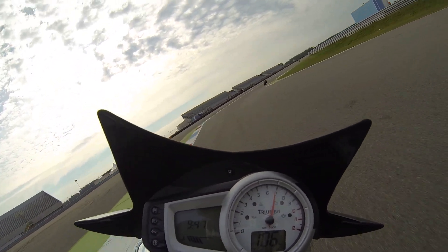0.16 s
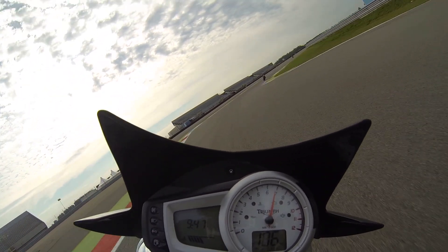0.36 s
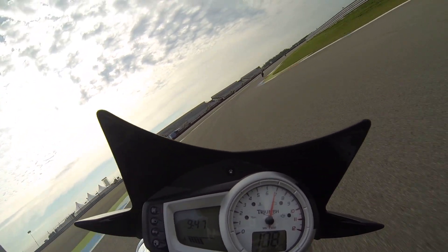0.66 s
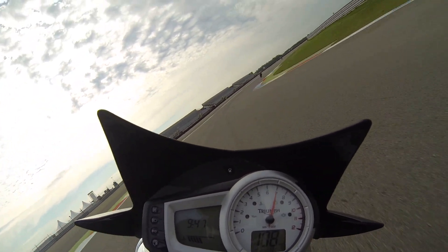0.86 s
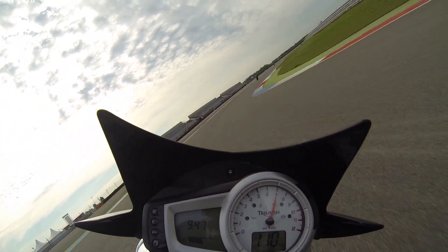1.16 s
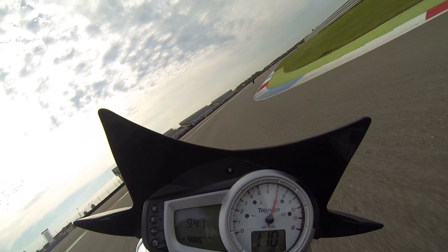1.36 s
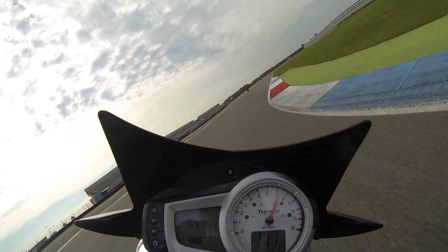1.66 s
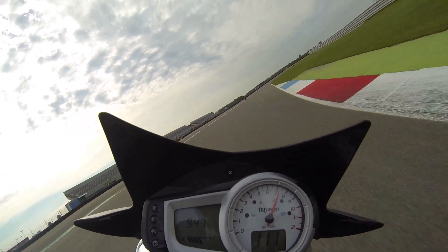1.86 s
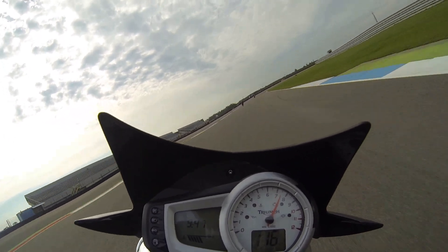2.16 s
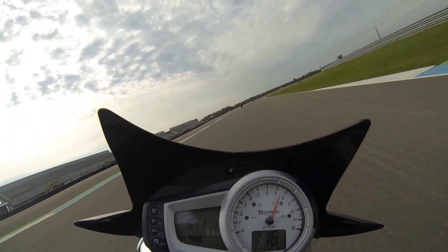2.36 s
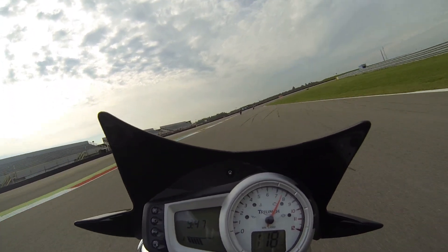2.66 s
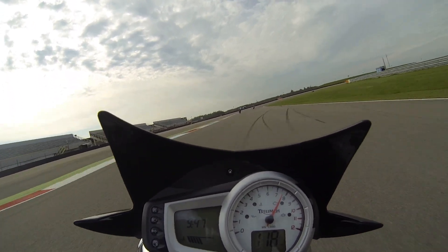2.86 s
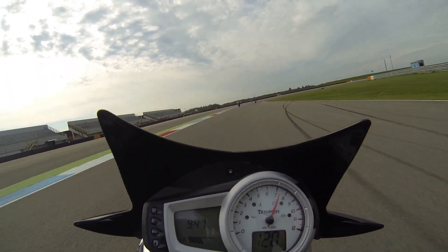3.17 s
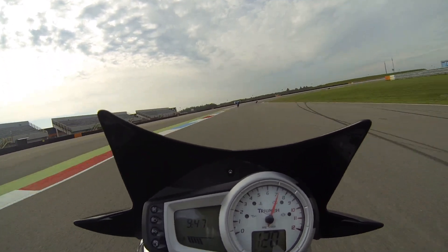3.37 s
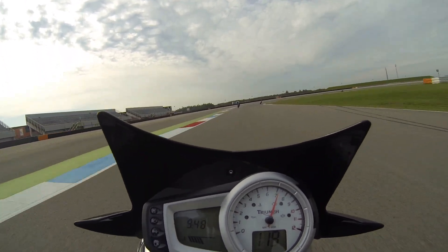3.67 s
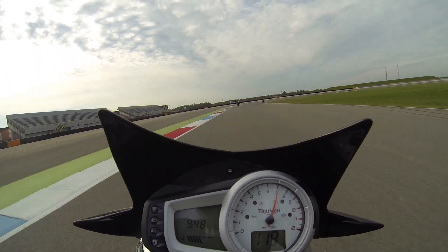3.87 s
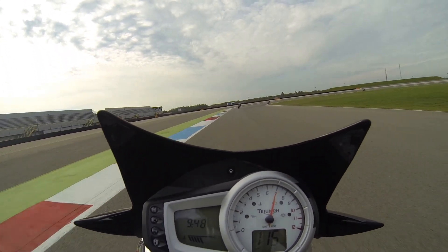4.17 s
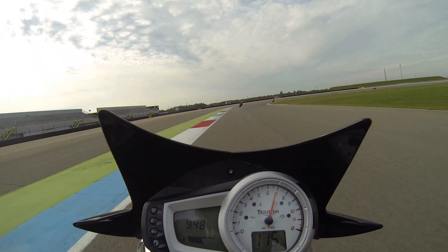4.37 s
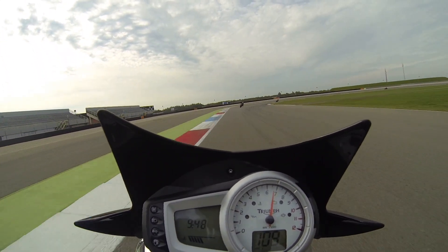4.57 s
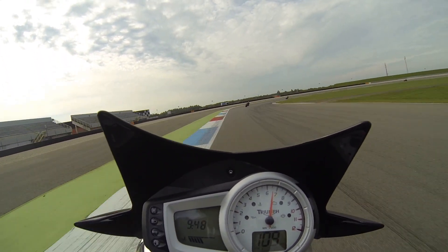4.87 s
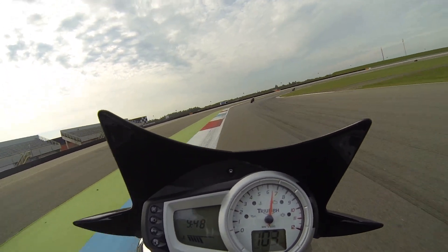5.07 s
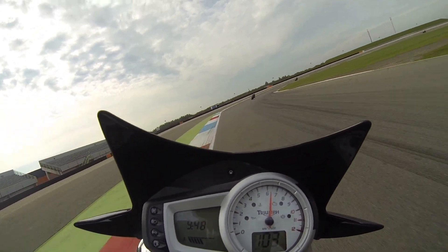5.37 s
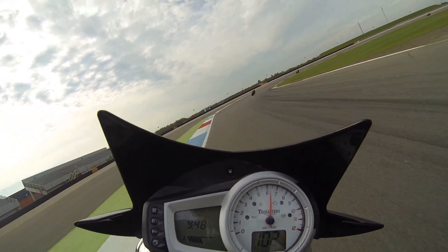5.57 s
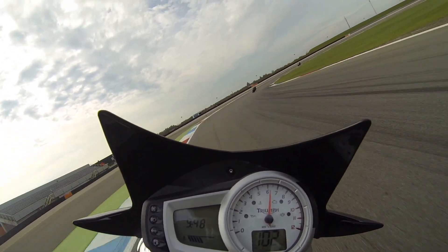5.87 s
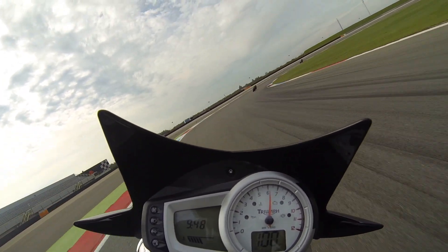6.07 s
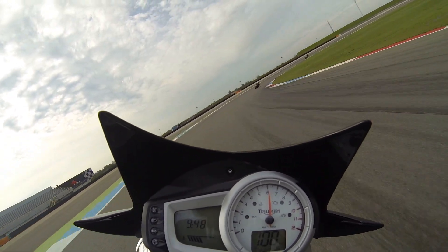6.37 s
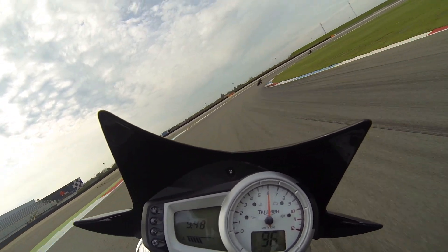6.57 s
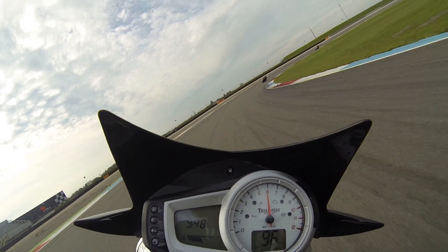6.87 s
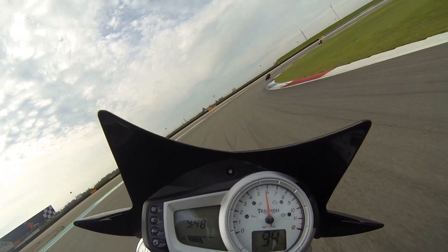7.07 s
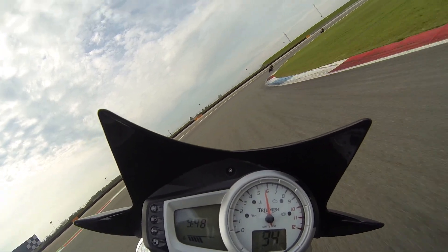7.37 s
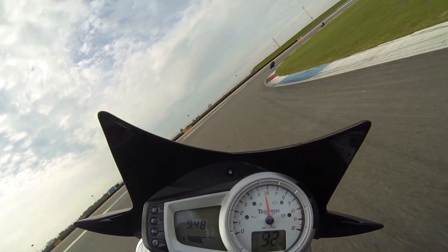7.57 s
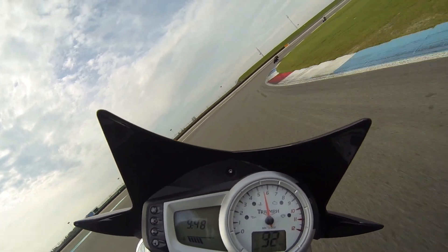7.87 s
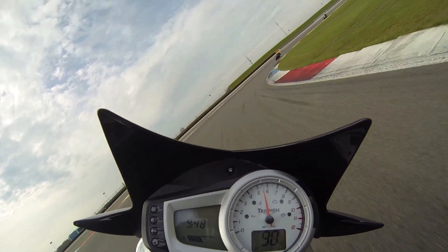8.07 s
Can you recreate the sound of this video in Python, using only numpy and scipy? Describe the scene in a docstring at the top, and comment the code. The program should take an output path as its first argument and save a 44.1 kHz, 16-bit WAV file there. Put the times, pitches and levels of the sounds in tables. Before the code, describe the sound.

A motorcycle on a race track drones low and steady, then rolls off and sinks in pitch with a rough, rattling throb under soft wind.

```python
"""Three-cylinder motorcycle, on and off the throttle

A motorcycle on a race track, heard through a hollow camera housing fixed behind its instruments. Crank-locked
sines make a drone, smooth on the throttle, then a rough, rattling throb as the bike rolls off and slows.
A repeating comb of engine orders and random contacts clatter through the housing's resonances; the chain whines,
valves tick, a small metal part jingles, and shaped noise makes the wind's rush and buffeting."""
import sys
import numpy as np
from scipy import signal
from scipy.fft import rfft, irfft, next_fast_len
from scipy.io import wavfile

SR = 44100
rng = np.random.default_rng(int(sys.argv[2]) if len(sys.argv) > 2 else 0)


def unload_wav(signal):
    """Save mono or channel-first audio to the path in sys.argv[1] as 16-bit WAV at rate SR, clipped to [-1, 1]."""
    wavfile.write(
        sys.argv[1],
        SR,
        np.round(np.clip(np.atleast_2d(signal).T, -1, 1) * 32767).astype(np.int16),
    )


N = 362061

# Wind and road shaking the mount; drives jingle and buffeting. Each row: time in seconds, level in dB.
MOUNT_SHAKING = [(0.0, -51), (0.29, -48), (0.95, -57.5), (1.04, -65.5), (1.47, -54), (1.7, -67.5),
                 (2.81, -72), (3.28, -58.5), (3.37, -65), (4.03, -55.5), (4.25, -62), (4.45, -51),
                 (6.56, -51.5), (8.2, -61.5)]
# Gusts that thump the mount. Each row: time in seconds, half length in seconds, rise in dB.
GUSTS = [(1.493, 0.051, 7), (7.849, 0.2, 5)]
# Colour of the buffeting. Each row: frequency in Hz, relative density in dB.
BUFFET_COLOUR = [(10, -19), (24, 5), (38, -8.5), (70, -13.5), (95, 2.5), (118, 3.5), (150, -11.5),
                 (200, -13), (300, -22), (500, -34), (1000, -68)]
# Colour of the air over the fairing. Each row: frequency in Hz, relative density in dB.
RUSH_COLOUR = [(100, -5), (300, 3), (600, -4.5), (2000, -13), (5500, -30.5), (9500, -33.5), (13000, -54.5)]
# Rasps that rise in pitch. Each row: start in seconds, end in seconds, level in dB.
RISING_RASPS = [(.23, 0.373, -33), (.82, 0.932, -37)]
# Housing buzzes. Each row: time in seconds, half length in seconds, peak level in dB.
BUZZES = [(2.02, 0.027, -46.5), (2.125, 0.032, -45), (2.82, 0.058, -46), (5.14, 0.028, -34),
          (6.503, 0.16, -42), (6.684, .05, -32.5), (7.3, 0.16, -43.5)]
# Resonances of the housing. Each row: frequency in Hz, width in Hz, boost in dB.
HOUSING_RESONANCES = [(620, 17, 0.5), (673, 120, 9.5), (867, 13, 6), (1245, 20, 7.5), (1346, 31, 6.5),
                      (1673, 61, 8), (1741, 53, 6.5), (2214, 170, 10.5), (2434, 110, 6.5), (2587, 19, 9.5),
                      (2930, 67, 2), (3457, 230, 10.5), (3870, 51, 8.5), (4340, 88, 5.5), (4750, 180, 4)]
# Passages where the chain sings out. Each row: start in seconds, end in seconds, whine in dB, its octave in dB.
CHAIN_SONGS = [(0.23, 0.477, -29.5, -55), (0.586, 0.775, -32, -53), (4.506, 4.724, -35.5, -47),
               (4.983, 5.193, -34, -45), (5.753, 6.015, -39, -38.5), (6.038, 6.626, -37.5, -37.5),
               (7.02, 7.48, -38, -41)]
# How hard the machine rattles; drives clatter, whine and roughness. Each row: time in seconds, level in dB.
RATTLE = [(0.0, -31), (0.42, -24.5), (0.52, -32.5), (0.89, -31), (0.98, -38.5), (1.24, -37), (1.49, -28.9),
          (1.7, -41), (2.7, -39.5), (2.79, -37.5), (3.71, -42), (3.92, -36), (4.28, -38), (4.51, -26),
          (5.15, -28.5), (5.29, -33), (5.73, -28.5), (6.71, -30.5), (6.8, -32.5), (8.2, -34.5)]
# Jolts that lift the rattling and shake the mount. Each row: time in seconds, half length in seconds, rise in dB.
JOLTS = [(0.261, .05, 1), (.72, .04, 5.5), (3.24, .045, 4.5), (3.982, .06, 3.5), (4.559, .05, 3.5),
         (5.091, 0.059, 3), (5.788, .05, 4)]
# Broad colour of the clatter. Each row: frequency in Hz, relative density in dB.
CLATTER_COLOUR = [(150, -12.5), (300, -4.5), (480, -4), (900, 0), (1150, -0.5), (1500, -5), (2000, -11),
                  (2900, -18.5), (4200, -23), (5300, -30), (7600, -37), (9500, -35.5), (12000, -48.5),
                  (15000, -58.5)]
# Orders that stand out of the engine's ticking. Each row: multiple of crank speed, relative strength in dB.
STRONG_ORDERS = [(3.5, 4), (4, 3), (4.5, 5), (5, 3), (5.5, 5), (6, -9), (7, 2), (8, 4), (9, 2), (11, 3),
                 (17, 6), (21, 2), (24, 5), (27.5, 4), (43, 7), (46, 6)]
# Engine speed. Each row: time in seconds, crank turns per second.
CRANK_SPEED = [(0.0, 104.2), (0.13, 104.3), (0.38, 102.4), (0.47, 103.6), (0.68, 103.5), (0.77, 106.9),
               (0.87, 105.9), (1.3, 106.1), (1.64, 110.6), (2.0, 111.4), (2.26, 113.7), (2.55, 114.1),
               (2.85, 115.0), (3.06, 113.2), (3.15, 111.7), (3.47, 110.4), (3.99, 105.9), (4.81, 99.6),
               (5.06, 98.1), (6.02, 94.3), (6.35, 91.6), (7.11, 87.5), (7.51, 86.3), (8.2, 82.7)]
# Once-a-turn shake of the crank, before the sags. Each row: time in seconds, level in dB.
CRANK_SHAKE = [(0.0, -12.5), (2.81, -7.5), (4.28, -9), (4.41, -18), (4.81, -19), (4.92, -12.5), (5.35, -25),
               (5.61, -15), (6.49, -11), (8.2, -14.5)]
# Throb of the firings. Each row: time in seconds, level in dB.
FIRING_THROB = [(0.0, -19.6), (0.4, -12), (0.54, -25.5), (0.87, -20), (0.98, -30.5), (1.51, -19.3),
                (1.62, -34.5), (2.14, -44.5), (3.06, -40.5), (3.24, -26), (3.33, -34), (4.27, -21),
                (4.62, -10), (4.98, -14.5), (5.27, -14), (6.1, -19.5), (6.22, -25.4), (8.2, -11)]
# Overtones of the drone against engine speed, before swing and sags.
# Each row: crank turns per second, order 2 in dB, order 3 in dB.
OVERTONES = [(81.6, -26.5, -32.5), (93.4, -28.5, -27), (94.4, -32.5, -31.5), (103.6, -40.5, -31),
             (112.6, -38, -32), (111.3, -40, -30), (119.7, -29, -26)]
# Brief sags of the drone; a negative loss is a rise.
# Each row: time in seconds, half length in seconds, loss of the shake in dB, loss of the overtones in dB.
SAGS = [(0.228, 0.031, 15, -5), (0.369, .04, 16, -4.5), (0.65, .05, 3.5, 0), (.84, 0.023, 17, -3),
        (1.127, 0.22, -0.5, 8), (1.662, 0.091, 1.5, 6.5), (1.454, 0.06, 3, 4), (3.226, 0.023, 6.5, 10.5),
        (3.842, 0.061, 2.5, 4.5), (4.188, 0.11, 0.5, 6.5), (4.464, 0.03, 14, -2.5), (4.763, 0.077, 3, 10.5)]
# Hums at four times the firing rate. Each row: time in seconds, half length in seconds, peak level in dB.
HUMS = [(0.588, 0.1, -38), (3.699, 0.057, -43), (4, 0.15, -32.5), (4.58, 0.14, -39.5), (5.096, 0.15, -36),
        (5.607, 0.16, -38), (8.146, 0.18, -48)]
# Faint orders of the drone.
# Each row: multiple of crank speed, level in dB at the usual rattle, share of the rattling's swing.
FAINT_ORDERS = [(1 / 2, -43.5, 0.99), (5 / 2, -48.5, 1.0), (4, -53.5, 0.12)]

USUAL_RATTLE_DB, USUAL_MOUNT_DB = -32, -56
# Layers that follow the rattling: level in dB at the usual rattle, share of its swing.
DULL, RASP, EDGE = (-38.0, 1.2), (-38.5, 1.0), (-47.24, 1)
WHINE, WHINE_OCTAVE, SIXTH_ORDER = (-46.5, 1.2), (-51.5, 1.3), (-52.5, .6)
# Layers that follow the mount: level in dB at the usual shaking, share of its swing.
JINGLE, BUFFETING = (-57.5, 1.05), (-27, 0.74)
THIRD_ORDER_SHARE = 0.41  # of the rattling's swing
WHEEL_PER_TURN = .157  # wheel turns per crank turn
WHEEL_RIPPLE = 0.018  # share of the crank shake, before it grows with unrest
REBOUND_DB, REBOUND_AFTER = 1.03, 3.2  # overshoot after a sag, and its delay in half lengths
RASP_FROM_HZ, RASP_TO_HZ = 800, 1154
BUZZ_HZ, BUZZ_WIDTH_HZ = 1238, 70
TICK_DB, TICK_SPREAD_DB, TICK_HZ, TICK_WIDTH_HZ = -68.5, 8, 5900, 3400
CHAIN_FADE_S = 0.081
CUTOFF_HZ = 15700


def from_db(db):
    """Decibels to gain."""
    return 10 ** (np.asarray(db) / 20)


def rms_one(x):
    """Scale to unit rms."""
    return x / np.sqrt(np.mean(x ** 2) + 1e-20)


def in_time(rows):
    """Draw each column of a time table as a curve, sample by sample."""
    s, *columns = np.transpose(rows)
    return [np.interp(np.arange(N) / SR, s, column) for column in columns]


def follow(layer, swing_db):
    """Level in dB of a layer that takes its share of a swing."""
    level_db, share = layer
    return level_db + share * swing_db


def bump(s, half_length):
    """A bell-shaped swell of height 1 around time s."""
    return np.exp(-((np.arange(N) / SR - s) / half_length) ** 2)


def held(start, end, fade_s):
    """Fade in, hold at up to 1, fade out; the fades are centred on start and end."""
    t = np.arange(N) / SR
    return np.clip(.5 + np.minimum(t - start, end - t) / fade_s, 0, 1)


def drift(rate):
    """Smooth random wander of spread 1 that changes about rate times a second."""
    step = 40  # samples between the points of the wander
    r = np.exp(-2 * step * np.pi * rate / SR)
    noise = rng.standard_normal(N // step + 2002)
    slow = rms_one(signal.lfilter([1], [1, -2 * r, r * r], noise)[2000:])  # drop the filter's start
    return np.interp(np.arange(N) / step, np.arange(len(slow)), slow)


def coloured(x, spectrum):
    """Filter a signal with a smooth tone curve; rms 1."""
    size = next_fast_len(N + SR // 2)
    hz, db = np.transpose(spectrum)
    bins = np.maximum(np.arange(size // 2 + 1) * SR / size, 1)
    gain = from_db(np.interp(np.log(bins), np.log(hz), db))
    return rms_one(irfft(rfft(x, size) * gain, size)[:N])


def resonate(x, hz, width):
    """A two-pole resonance with a gain of about 1 at its peak."""
    r = np.exp(-np.pi * width / SR)
    feed = np.array([1, 0, -1]) * (1 - r * r) / 2
    return signal.lfilter(feed, [1, -2 * r * np.cos(2 * np.pi * hz / SR), r * r], x + 1e-18)


def lowpass(hz):
    """Fourth-order low-pass sections."""
    return signal.butter(4, hz, fs=SR, output="sos")


def loose_hits(per_s, spread_db):
    """Random contacts of uneven size and either sign; rms 1."""
    sizes = from_db(spread_db * np.minimum(rng.exponential(1, N), 4)) * rng.choice([-1, 1], N)
    return rms_one(sizes * (rng.random(N) < per_s / SR))


def wind(buffet_db):
    """Turbulence: low noise buffets the mount under a gently varying rush of air."""
    buffet = from_db(buffet_db) * coloured(rng.standard_normal(N), BUFFET_COLOUR)
    rush = from_db(-44.0) * coloured(rng.standard_normal(N), RUSH_COLOUR)
    return buffet + rush * from_db(0.8 * drift(4.8))


def jingle(level_db):
    """Random contacts knock a small loose metal part into a single high ring."""
    ring = resonate(loose_hits(per_s=230, spread_db=-3.0), hz=6965, width=38)
    return rms_one(ring) * from_db(level_db)


def rising_rasps():
    """A narrow, rough band of noise slides upward and quickly fades."""
    out = 0
    for start, end, level_db in RISING_RASPS:
        hz, = in_time([(start, RASP_FROM_HZ), (end, RASP_TO_HZ)])
        angle = 2 * np.pi * np.cumsum(hz) / SR
        band = drift(130) * np.cos(angle) + drift(130) * np.sin(angle)
        out = out + from_db(level_db) * held(start, end, fade_s=0.033) * band
    return out


def buzzes():
    """Runs of contacts set a mid resonance of the housing buzzing."""
    gain = sum(from_db(db) * bump(s, half) for s, half, db in BUZZES)
    hits = loose_hits(per_s=760, spread_db=6.0)
    return gain * rms_one(resonate(hits, BUZZ_HZ, BUZZ_WIDTH_HZ))


def valve_ticks(turns):
    """Strikes of uneven size twice a crank turn excite a broad, high resonance."""
    strikes = np.diff(np.floor(2 * turns), prepend=0)
    sizes = from_db(TICK_SPREAD_DB * np.minimum(rng.standard_normal(N), 2.2))
    click = strikes * sizes
    for _ in range(2):
        click = resonate(click, TICK_HZ, TICK_WIDTH_HZ)
    return from_db(TICK_DB) * rms_one(signal.sosfilt(lowpass(10500), click))


def housing(x):
    """The hollow housing lifts its own resonances; rms 1."""
    for hz, width, boost_db in HOUSING_RESONANCES:
        x = x + (from_db(boost_db) - 1) * resonate(x, hz, width)
    return rms_one(x)


def engine_order(turns, multiple, level_db, rough, flutter_hz):
    """A sine locked to the crank, fluttering in strength and phase around its level."""
    angle = 2 * np.pi * multiple * turns
    in_phase = (1 + rough * drift(flutter_hz)) * np.cos(angle)
    across = rough * drift(flutter_hz) * np.sin(angle)
    return np.sqrt(2) * from_db(level_db) * (in_phase + across)


def chain(turns, swing_db):
    """Links meet the sprocket in a wavering whine that pulses with the wheel and rings in the housing."""
    whine_gain = from_db(follow(WHINE, swing_db))
    octave_gain = from_db(follow(WHINE_OCTAVE, swing_db))
    for start, end, whine_db, octave_db in CHAIN_SONGS:
        song = held(start, end, CHAIN_FADE_S)
        whine_gain = np.hypot(whine_gain, from_db(whine_db) * song)
        octave_gain = np.hypot(octave_gain, from_db(octave_db) * song)
    links_per_turn = 6.6
    tension = np.sin(2 * np.pi * WHEEL_PER_TURN * turns + 0.52 * drift(9.7))
    meshing = turns + .011 * tension  # tension shifts the meeting of the links
    whine = housing(engine_order(meshing, links_per_turn, 0, rough=0.44, flutter_hz=30.6))
    octave = housing(engine_order(meshing, 2 * links_per_turn, 0, rough=0.45, flutter_hz=30))
    return whine_gain * whine * (1 + .25 * tension) + octave_gain * octave * (1 + .65 * tension)


def valve_gear(turns, rough, count=104, size=4096):
    """Ticking that repeats every two turns: an uneven comb of half orders whose balance slowly shifts."""
    strength = from_db(2.5 * rng.standard_normal(count) - 1.5)
    strength[:7] = 0  # nothing below order 3.5
    for multiple, db in STRONG_ORDERS:
        strength[int(round(2 * multiple))] = from_db(db)
    out = 0
    # one steady cycle, and two whose shares wander
    for share in (1, rough * drift(1.5), rough * drift(6)):
        cycle = irfft(strength * np.exp(2j * np.pi * rng.random(count)), size)
        place = turns / 2 % 1 * size
        out = out + share * np.interp(place, np.arange(size + 1), np.append(cycle, cycle[0]))
    return rms_one(out)


def clatter(turns, dull_db, rasp_db, edge_db, unrest):
    """Regular engine ticking and loose fairing chatter ring in the housing, levelled in three bands."""
    play = 0.00094 * drift(40)  # looseness of the timing, in turns
    ticking = .8 * coloured(valve_gear(turns + play, rough=.35), CLATTER_COLOUR)
    ticking *= from_db(-.35 * np.maximum(dull_db + 41.5, 0))  # hard shaking favours chatter over ticking
    hits = loose_hits(per_s=2000, spread_db=-1.0) * from_db(1.66 * drift(15))
    chatter = .68 * coloured(hits, CLATTER_COLOUR) * unrest ** .2
    # contact pressure follows engine cycle, crank turn, piston reversal and wheel turn
    pressed = 1 + 0.07 * np.cos(np.pi * turns) + 0.074 * np.cos(2 * np.pi * turns)
    pressed += 0.22 * np.cos(4 * np.pi * turns)
    pressed += 0.027 * np.sin(2 * np.pi * WHEEL_PER_TURN * turns)
    sound = housing((ticking + chatter) * pressed)
    dull = signal.sosfiltfilt(lowpass(1150), sound)
    body = signal.sosfiltfilt(lowpass(2750), sound)
    out = from_db(dull_db) * rms_one(dull)
    out += from_db(rasp_db) * rms_one(body - dull)
    return out + from_db(edge_db) * rms_one(sound - body)


def drone(speed, turns, swing_db, unrest):
    """Crank shake, three firings in two turns, overtones and a gearbox shaft; some roughen with unrest."""
    (shake_db,), (firing_db,) = in_time(CRANK_SHAKE), in_time(FIRING_THROB)
    speeds, *columns = np.transpose(OVERTONES)
    second_db, third_db = [np.interp(speed, speeds, column) for column in columns]
    third_db = third_db + THIRD_ORDER_SHARE * swing_db
    for s, half, shake_loss_db, overtone_loss_db in SAGS:
        sag = bump(s, half)
        rebound = bump(s + REBOUND_AFTER * half, half)
        shake_db = shake_db - shake_loss_db * sag + REBOUND_DB * rebound
        second_db = second_db - overtone_loss_db * sag
        third_db = third_db - overtone_loss_db * sag
    hum = from_db(follow(SIXTH_ORDER, swing_db))
    hum = hum + sum(from_db(db) * bump(s, half) for s, half, db in HUMS)

    out = engine_order(turns, 1, shake_db, rough=0.02 * unrest ** 2, flutter_hz=35)
    out *= 1 + WHEEL_RIPPLE * (1 + unrest) * np.sin(2 * np.pi * WHEEL_PER_TURN * turns)
    firing_lag_turns = 1 / 12
    out += engine_order(turns - firing_lag_turns, 3 / 2, firing_db, rough=0.16 * unrest, flutter_hz=9)
    out += engine_order(turns, 2, second_db, rough=.2, flutter_hz=4.6)
    out += engine_order(turns, 3, third_db, rough=.16, flutter_hz=4)
    out += hum * engine_order(turns, 6, 0, rough=.16, flutter_hz=5)
    for multiple, *layer in FAINT_ORDERS:
        out += engine_order(turns, multiple, follow(layer, swing_db), rough=0.12, flutter_hz=5.9)
    shaft_ratio = .577  # shaft turns per crank turn
    shaft = engine_order(turns, shaft_ratio, level_db=-33.5, rough=0.19, flutter_hz=3.7)
    return out + unrest ** 2 * shaft


def scene():
    """Engine layers follow the crank; clatter and roughness follow the rattling, jingle and buffeting the mount."""
    speed, = in_time(CRANK_SPEED)
    turns = np.cumsum(speed * (1 + .0007 * drift(8))) / SR  # the speed wavers slightly
    (rattle_db,), (mount_db,) = in_time(RATTLE), in_time(MOUNT_SHAKING)
    jolt_db = sum(db * bump(s, half) for s, half, db in JOLTS)
    swing_db = rattle_db - USUAL_RATTLE_DB + jolt_db
    mount_swing_db = mount_db - USUAL_MOUNT_DB + jolt_db
    dull_db, rasp_db, edge_db = [follow(layer, swing_db) for layer in (DULL, RASP, EDGE)]
    gust_db = sum(db * bump(s, half) for s, half, db in GUSTS)
    buffet_db = follow(BUFFETING, mount_swing_db) + gust_db
    unrest = from_db(np.minimum(dull_db + 39.5, 1.5))  # grows with the rattling up to a cap

    out = wind(buffet_db) + jingle(follow(JINGLE, mount_swing_db))
    out += rising_rasps() + buzzes() + valve_ticks(turns)
    out += chain(turns, swing_db) + clatter(turns, dull_db, rasp_db, edge_db, unrest)
    out += drone(speed, turns, swing_db, unrest)
    return out[None]


def record(dry):
    """Round off the highest peaks, fade in quickly and cut the extreme treble."""
    ceiling, fade_in_s = .85, .004
    rounded = dry / (1 + (dry / ceiling) ** 10) ** (1 / 10)
    rounded = rounded * np.minimum(np.arange(N) / SR / fade_in_s, 1)
    return signal.sosfilt(signal.cheby2(12, 70, CUTOFF_HZ, fs=SR, output="sos"), rounded)


dry = scene()
out = record(dry)
unload_wav(out)
```